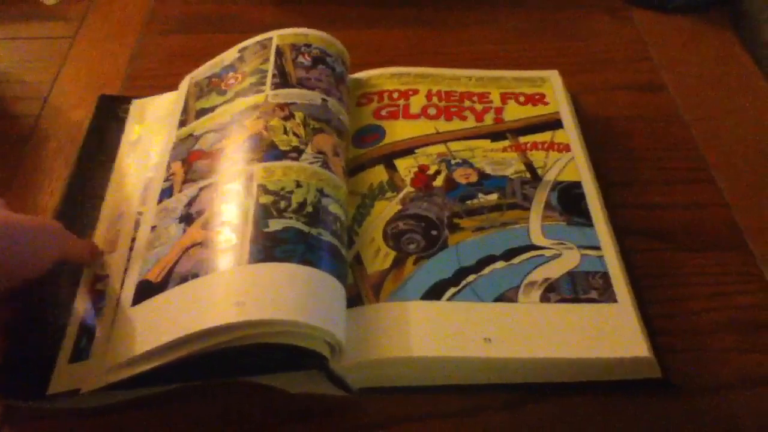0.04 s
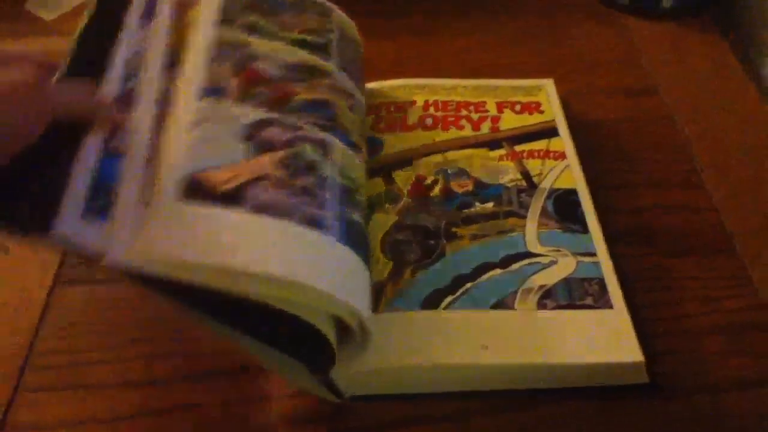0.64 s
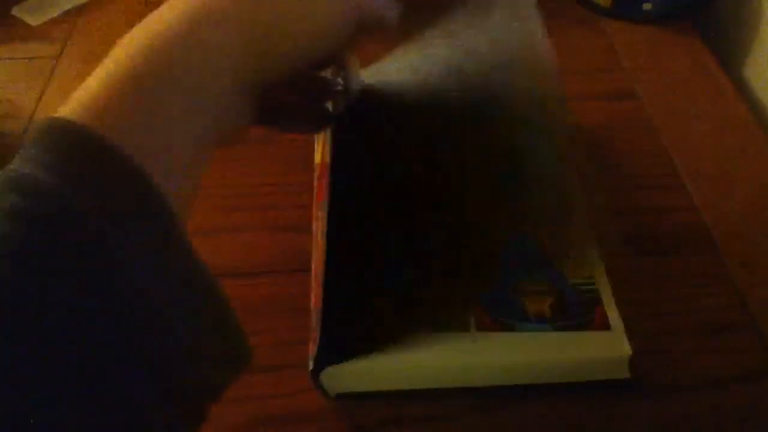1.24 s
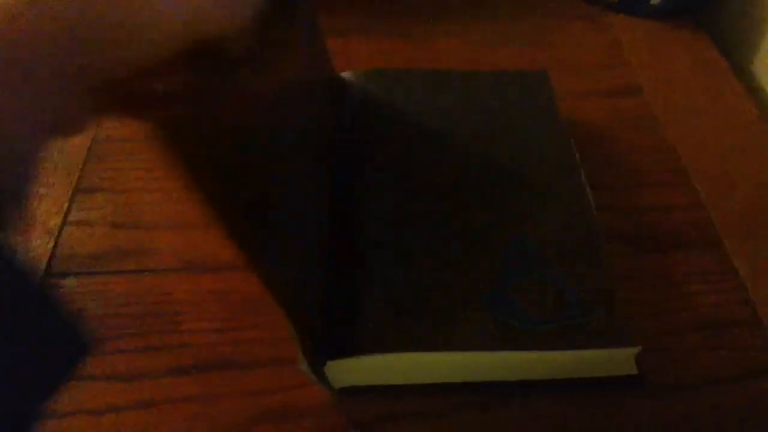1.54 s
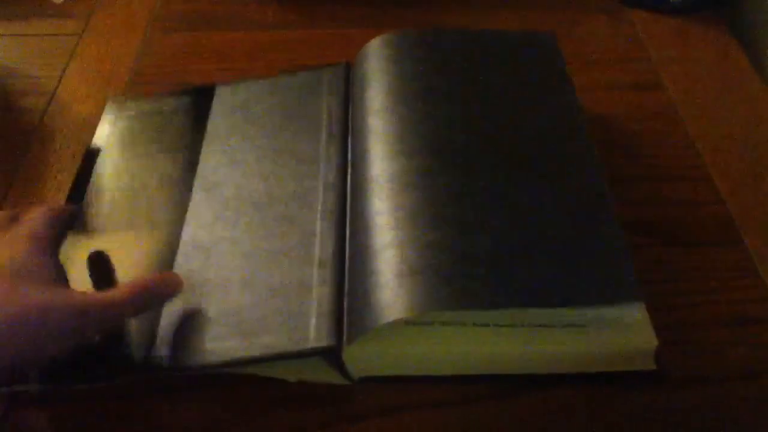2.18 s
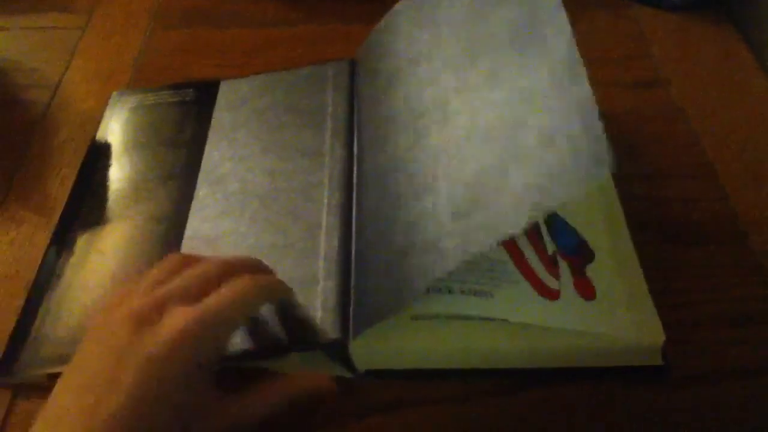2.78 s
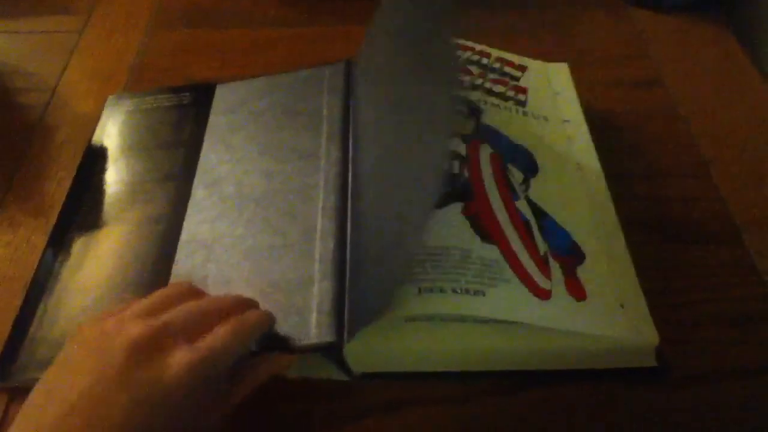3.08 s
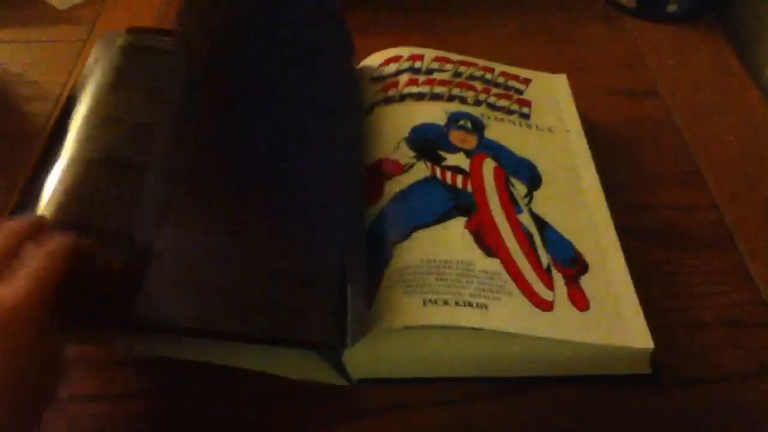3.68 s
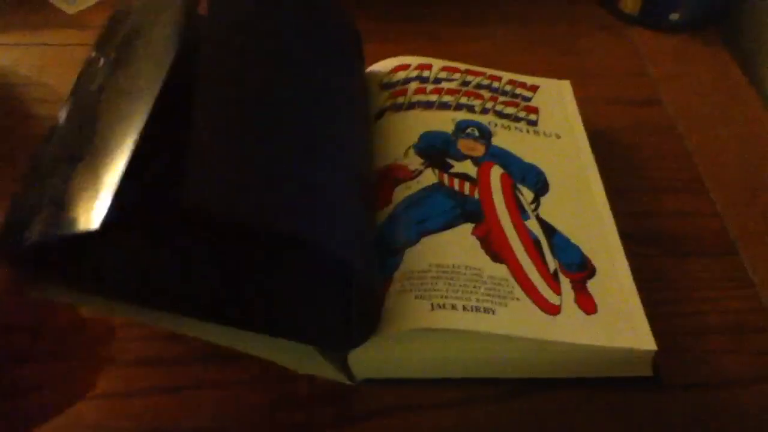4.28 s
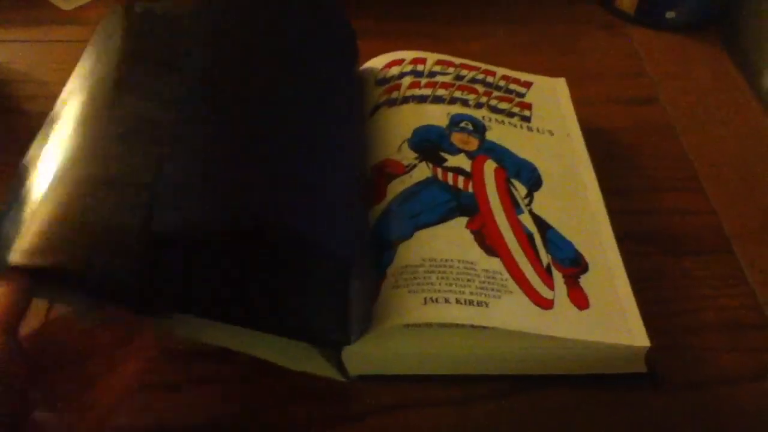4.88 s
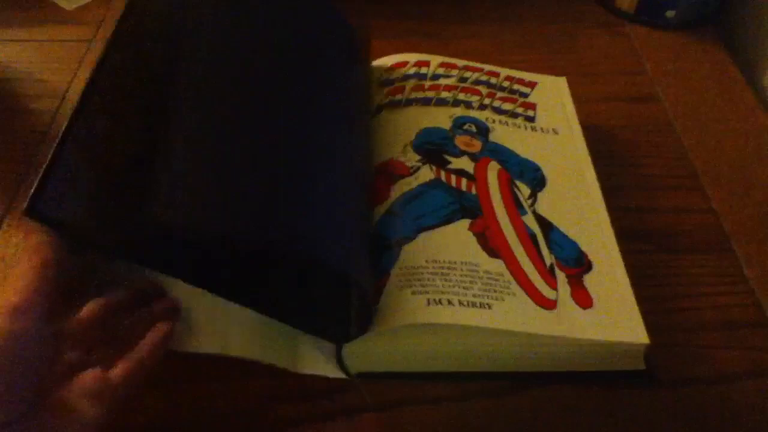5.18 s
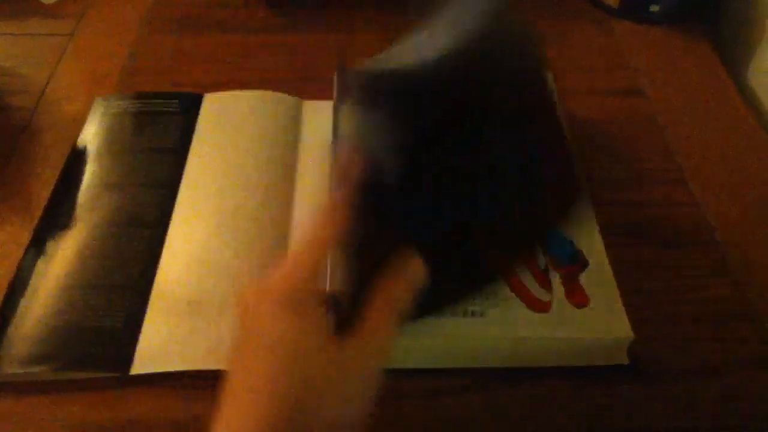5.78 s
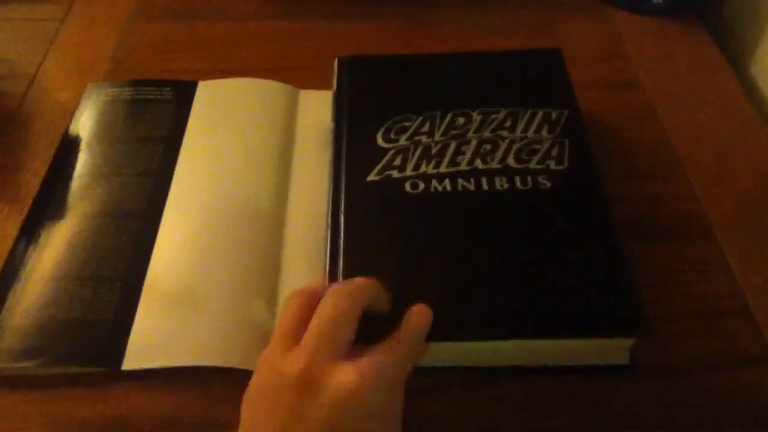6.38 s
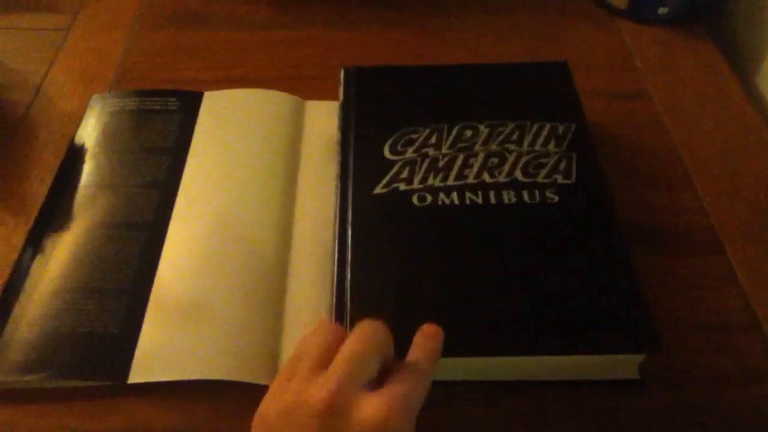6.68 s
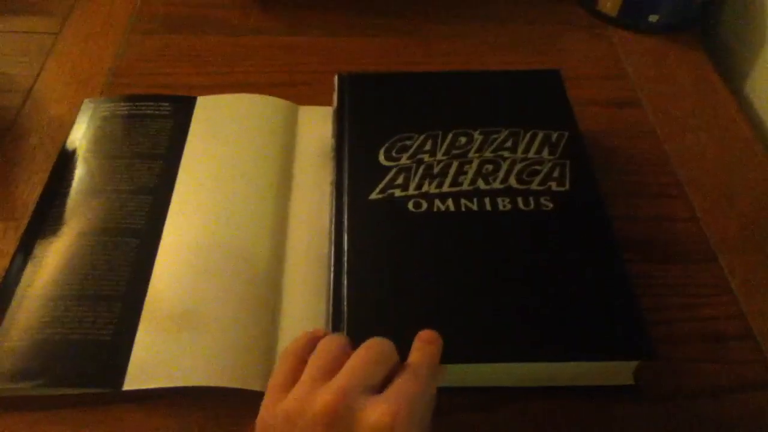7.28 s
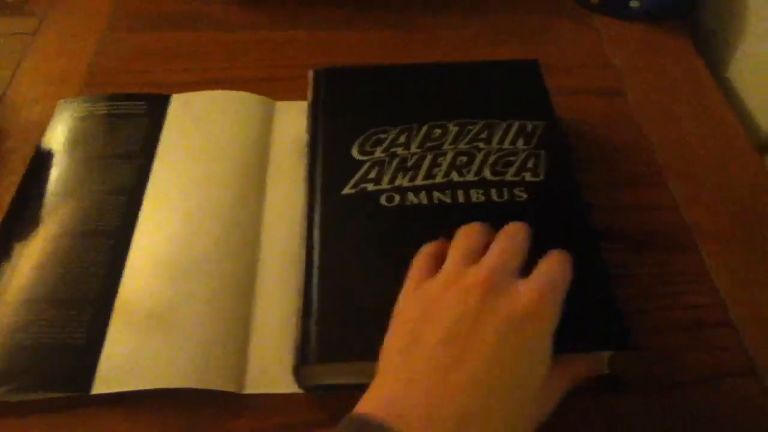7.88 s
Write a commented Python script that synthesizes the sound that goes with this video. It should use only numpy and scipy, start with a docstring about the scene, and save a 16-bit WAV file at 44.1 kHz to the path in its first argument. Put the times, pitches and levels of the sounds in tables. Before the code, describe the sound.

A thick hardback with glossy pages is handled on a wooden table in a small, quiet room, over faint rumble and microphone hiss. Soft rubbing and tiny crinkles fill the first second. At 1.1 seconds a block of pages slaps over loudly with a low thump, followed by smaller slaps until 1.5. The cover slides with a soft hiss around 2 seconds, and paper flicks at 2.3. Faint brushing continues, with a light knock at 3.5, a sharper flick at 4 and a low shuffle until 4.7. Just after 5 seconds the dust jacket drags and snaps free in a quick cluster, ending in a loud, sharp cover knock and thump at 5.3. Softer flicks and a bump follow until 5.7 as the book settles shut. Faint finger rubs come around 6 seconds and again near 8.

```python
"""Handling a glossy hardback

A thick book lies on a wooden table in a small, quiet room. A block of pages slaps over, the cover is
opened, the dust jacket slides, flicks and snaps free, and the book is shut. Paper cracks in bursts of
tiny contacts, the stiff cover knocks, the heavy block thumps, and sheets hiss as they rub."""
import sys
import numpy as np
from scipy import signal
from scipy.fft import rfft, irfft, next_fast_len
from scipy.io import wavfile

SR = 44100
rng = np.random.default_rng(int(sys.argv[2]) if len(sys.argv) > 2 else 0)


def master_out(mix):
    """Clip the mix to full scale and print it as 16-bit PCM to the path in sys.argv[1]."""
    frames = np.transpose(np.atleast_2d(mix))
    ceiling = np.clip(frames, -1, 1)
    pcm = np.round(ceiling * 32767).astype(np.int16)
    wavfile.write(sys.argv[1], SR, pcm)


N = 354561

# Room rumble and microphone hiss. Each row: frequency in Hz, relative level in dB.
ROOM_TONE_EQ = [(12, -56), (20, -16), (43, -10), (146, -5.5), (177, 0), (210, -7.5), (234, 1.5), (262, -7),
                (293, -7), (422, -11), (499, -13), (660, -16.5), (1480, -20), (14700, -27), (16000, -33.5)]
# The room's tail. Each row: frequency in Hz, level against the dry sound in dB, t60 in seconds.
REVERB_BANDS = [(118, -6, 0.19), (400, -3, 0.28), (1000, -6, 0.18), (2530, -7.5, 0.26), (6000, -13, 0.23),
                (14000, -13, 0.19)]

# Sheets and fingers rubbing.
# Each row: start in seconds, length in seconds, mid-stroke level in dB, tilt in dB per octave.
RUB_STROKES = [(0, .16, -58.5, -3), (.23, 0.18, -60, -5.5), (0.403, .14, -55, -1), (0.556, .12, -64, -1),
               (0.757, 0.21, -62, -1), (2.331, 0.26, -60.5, 0), (2.76, 0.082, -60.5, -2),
               (3.001, 0.42, -68.5, -6), (3.36, .22, -55.5, 0), (3.58, 0.34, -56, .5),
               (5.224, 0.092, -42, -8.5), (5.33, 0.26, -54.5, -2.5), (5.751, 0.41, -59.5, 0),
               (6.198, 0.26, -68.5, -3), (7.679, 0.43, -62, 2)]
# The opened cover sliding over the table. Each row: start in seconds, length in seconds, level in dB.
SLIDE_SURGES = [(1.757, 0.14, -52), (1.883, 0.15, -51), (2.006, 0.11, -49.5), (2.09, .11, -58.5)]
# The tone of a rub, the slide, the jacket pull and one contact of paper on paper.
# Each row: frequency in Hz, relative level in dB.
RUB_EQ = [(100, -25), (500, -1.5), (950, 9.5), (1600, -1.5), (3500, 3), (5000, 0.5), (8000, 0),
          (12000, -2.5), (16000, -48)]
SLIDE_EQ = [(100, -23), (500, -6), (1000, 5), (1600, -2), (3000, 3), (5500, -0.5), (8000, -0.5),
            (12000, -6), (16000, -28)]
PULL_EQ = [(100, -9), (600, 5), (900, 7.5), (1400, 7.5), (2150, 10), (3500, 2.5), (7500, -7.5),
           (11000, -14.5), (16000, -31)]
PAPER_EQ = [(60, -8), (300, -8), (700, -0.5), (1100, 4), (1600, 4.5), (2500, 5), (3400, 2), (4500, 4),
            (5600, 0.5), (7500, 2.5), (11000, -4), (16000, -17.5)]

# Modes of the book lying on the table, and of its cover board.
# Each row: frequency in Hz, relative level in dB, t60 in seconds.
BLOCK_MODES = [(122.6, 2.5, 0.12), (184, -7, 0.044), (231, 12, 0.043), (366, -1.5, 0.057), (417, -18, .035)]
BOARD_MODES = [(376, 3, 0.013), (790, -31, .025), (1006, 11, 0.015), (1194, 4.5, 0.018), (1480, -3, 0.024),
               (1640, 0.5, 0.019), (2098, -2, 0.03), (7200, 9, 0.0023)]
# The book's weight meeting the table. Each row: start in seconds, level in dB over 10 ms.
THUMP_CUES = [(.114, -48.5), (1.1201, -26), (1.226, -44), (1.4171, -36.5), (2.454, -48.5), (5.262, -41),
              (5.318, -33.5), (5.473, -47), (5.708, -43), (5.726, -51)]
# Cover and jacket edges knocking. Each row: start in seconds, level in dB over 10 ms,
# contact time in ms, pitch ratio of the modes, chatter decay in ms.
KNOCK_CUES = [(.082, -54, .4, 0.42, 1.5), (.190, -53.5, 0.25, 0.98, 1.5), (.421, -54.5, .25, 0.55, 1.5),
              (0.478, -52, .18, 1.2, 1.5), (.566, -55, 0.18, 1.2, 1.5), (.620, -55.5, .25, 0.96, 3.5),
              (1.1028, -32.5, 0.59, 0.84, 10), (1.1145, -25.5, 0.082, 1.06, 1.9),
              (1.2202, -36.5, 0.077, 1.13, 4.5), (1.416, -41.5, 0.14, 1.03, 2.4),
              (2.2654, -42.5, 0.75, 0.97, 1.5), (2.4535, -47, 0.94, .56, 1.3), (3.469, -42, 0.26, 1.2, 7),
              (3.501, -53, 0.37, 1.16, 1.5), (3.678, -51.5, 0.75, .99, 3), (4.0309, -45, 0.11, 0.97, 2),
              (4.716, -45, 0.16, 0.95, 9), (5.26, -31.5, 0.15, 1.16, 19), (5.3174, -18.5, 0.045, 1.04, 2.2),
              (5.3194, -30.5, .07, 1.3, 5.9), (5.521, -49, 1, 1.05, 1.8)]
# The jacket buckling as it is held and bent.
# Each row: time in seconds, level in dB over 10 ms, crease resonance in Hz.
CRINKLE_CUES = [(0.114, -52.5, 500), (0.3007, -50.5, 1900), (.341, -49.5, 3730), (0.4775, -50, 3020),
                (.588, -51, 1100), (.775, -55.5, 3200), (1.867, -46.5, 4430), (2.3077, -49.5, 4000),
                (3.310, -57, 2200), (3.978, -59, 4000), (4.853, -56, 1000), (5.011, -52, 1700),
                (5.040, -56.5, 3000), (5.0837, -51, 1200), (5.5442, -50.5, 1000), (7.378, -59, 1500)]
# Sheets slapping down or snapping free. Each row: time of fullest contact in seconds, level in dB
# over 10 ms, contact spread in ms, tilt in dB per octave, resonance of the bent sheet in Hz.
SLAP_CUES = [(1.1122, -25, 0.5, -2, 5560), (1.1162, -16, 2.3, 4.5, 2410), (1.2241, -32.5, 0.26, 3, 7200),
             (1.4208, -39, 1.1, -2, 3420), (1.5345, -47.5, 0.97, 3.5, 4800), (2.2624, -35.5, .28, -4, 3350),
             (2.2666, -37.5, 1.6, -2, 890), (4.015, -46, 3.5, -3.5, 1400), (4.0288, -33, 2.4, -2.5, 2600),
             (4.183, -43, 14.7, -1, 2240), (4.716, -48.5, 9.4, -1, 1000), (5.1536, -37.5, 1.2, -2.5, 2100),
             (5.207, -38, .8, -4.5, 4000), (5.231, -37, 1, -0.5, 5460), (5.2624, -33, 2.4, -2.5, 2280),
             (5.3179, -30.5, 0.71, 2, 7200), (5.3273, -31.5, 0.37, -8, 1830),
             (5.3493, -38, .82, -2.5, 1110), (5.624, -40, 3.2, -1.5, 3720),
             (5.7108, -45.5, 0.75, -1.5, 10500)]


def undb(db):
    """Decibels to gain."""
    return 10 ** (np.asarray(db) / 20)


def unit(x):
    """Scale to rms 1."""
    return x / np.sqrt(np.mean(x ** 2))


def hit_level(x, db):
    """Scale a hit so that its energy, spread over 10 ms, has this level."""
    return x * undb(db) * np.sqrt(.01 * SR / np.sum(x ** 2))


def add(track, start_s, x):
    """Mix a sound into a track at its cue."""
    i = max(int(start_s * SR), 0)
    track[i:i + len(x)] += x[:max(len(track) - i, 0)]


def octaves(hz):
    """Octaves above 2 kHz, the pivot of every tilt."""
    return np.log2(hz / 2000)


def curve_at(hz, points):
    """Read (Hz, value) points on a log-frequency axis."""
    point_hz, value = np.transpose(points)
    return np.interp(np.log(hz + 1), np.log(point_hz), value)


def equalise(x, curve, tilt_db=0):
    """Minimum-phase EQ, tilted by tilt_db per octave above 700 Hz."""
    size = next_fast_len(len(x) + 2048) // 2 * 2
    hz = np.fft.rfftfreq(size, 1 / SR)
    db = curve_at(hz, curve) + tilt_db * octaves(np.maximum(hz, 700))
    cepstrum = irfft(np.log(undb(db)))
    cepstrum[1:size // 2] *= 2  # folded forward, so nothing rings ahead of an attack
    cepstrum[size // 2 + 1:] = 0
    return irfft(rfft(x, size) * np.exp(rfft(cepstrum)))[:len(x)]


def bands(x, count=17):
    """Split into overlapping bands that add up to the whole: (centre Hz, band) pairs."""
    centres = np.geomspace(62, 16000, count)
    spectrum, hz = rfft(x), np.fft.rfftfreq(len(x), 1 / SR)
    return [(c, irfft(spectrum * curve_at(hz, np.c_[centres, centres == c]), len(x))) for c in centres]


def wobble(n, rate):
    """Random modulation of spread near 1, with `rate` new values a second."""
    steps = np.arange(n) * rate / SR
    return np.interp(steps, np.arange(4096), rng.standard_normal(4096))


def ring(modes, ratio=1, size=12000):
    """Decaying modes of a struck body."""
    t = np.arange(size) / SR
    return sum(undb(db - 60 * t / t60) * np.sin(2 * np.pi * hz * ratio * t) for hz, db, t60 in modes)


def grains(n, scatter_db):
    """Dense tiny contacts; more scatter makes a grittier texture."""
    noise, strength = rng.standard_normal((2, 65536))[:, :n]
    return unit(noise * undb(scatter_db * strength))


def stroke(length_s, attack_s=0.019, release_s=0.037):
    """Envelope of one push of the hand: it gathers speed, holds and eases off."""
    t = np.arange(int(length_s * SR)) / SR
    return np.minimum(t / attack_s, 1) * np.minimum((length_s - t) / release_s, 1)


def room_tone(level_db=-56, waver_db=0.46):
    """The bed: a faintly wavering house rumble under even microphone hiss."""
    bed = unit(equalise(rng.standard_normal(N), ROOM_TONE_EQ))
    rumble = signal.sosfilt(signal.butter(2, 450, fs=SR, output="sos"), bed)
    waver = undb(waver_db * wobble(N, rate=12)) - 1
    return (bed + rumble * waver) * undb(level_db)


def reverb(x, build_s=0.0012, size=22050):
    """Dense reflections build within milliseconds and leave a short tail, faintest in the treble."""
    t, table, tail = np.arange(size) / SR, np.array(REVERB_BANDS), 0
    for hz, band in bands(rng.standard_normal(size)):
        wet_db, t60 = curve_at(hz, table[:, [0, 1]]), curve_at(hz, table[:, [0, 2]])
        fade = (1 - np.exp(-t / build_s)) * undb(-60 * t / t60)
        tail += band * fade / np.sqrt(np.sum(fade ** 2)) * undb(wet_db)
    return x + signal.fftconvolve(x, tail)[:N]


def spine_shuffle(start_s=4.13, length_s=0.58, level_db=-57.5):
    """The hand shifts the book: small slips of the spine keep the block's low modes murmuring."""
    out = np.zeros(N)
    swell = np.sin(np.linspace(0, np.pi, int(length_s * SR)))
    slips = grains(len(swell), scatter_db=0.5)
    murmur = signal.fftconvolve(slips, ring(BLOCK_MODES))[:len(swell)]
    add(out, start_s, unit(murmur) * swell * undb(level_db))
    return out


def friction(envelope, tilt_db, curve, scatter_db, catch_db):
    """Paper fibres catch and slip; the tilt sets the brightness without changing the level."""
    slips = equalise(grains(len(envelope), scatter_db), curve)
    hiss, power = 0, 0
    for hz, band in bands(slips):
        gain = undb(tilt_db * octaves(max(hz, 700)))
        hiss += gain * band
        power += gain ** 2 * np.mean(band ** 2)
    catch = undb(catch_db * wobble(len(envelope), rate=120))
    return unit(hiss / np.sqrt(power)) * envelope * catch


def page_rubs(swell_db=5):
    """Sheets and fingers brush over each other in short strokes."""
    out = np.zeros(N)
    for start_s, length_s, db, tilt_db in RUB_STROKES:
        push = stroke(length_s)
        arc = np.sin(np.linspace(0, np.pi, len(push)))  # the hand is fastest in mid-stroke
        envelope = undb(db + swell_db * (arc - 1)) * push
        add(out, start_s, friction(envelope, tilt_db, RUB_EQ, scatter_db=3.0, catch_db=2.3))
    return out


def cover_slide(start_hz=6300, sink_octaves_per_s=3.8, width_octaves=0.55, peak_db=11, catch_db=1.0):
    """The glossy jacket hisses over the wood; its resonance sinks as more of it lies flat."""
    out = np.zeros(N)
    for start_s, length_s, db in SLIDE_SURGES:
        surge = stroke(length_s)
        elapsed = start_s - SLIDE_SURGES[0][0] + np.arange(len(surge)) / SR
        centre_hz = start_hz * 2 ** (-sink_octaves_per_s * elapsed)
        slips = equalise(grains(len(surge), scatter_db=3.0), SLIDE_EQ)
        hiss = 0
        for hz, band in bands(slips, count=33):
            bell = np.exp(-.5 * (np.log2(hz / centre_hz) / width_octaves) ** 2)
            hiss += band * undb(peak_db * bell)
        add(out, start_s, unit(hiss) * surge * undb(db + catch_db * wobble(len(surge), rate=90)))
    return out


def jacket_pull(start_s=5.07, length_s=0.195, whip_s=5.187, whip_width_s=0.026, gain_db=-34):
    """The jacket drags, then whips off the board; the faster it moves, the louder and brighter it is."""
    out, grip = np.zeros(N), stroke(length_s)
    t = start_s + np.arange(len(grip)) / SR
    whip = np.exp(-.5 * ((t - whip_s) / whip_width_s) ** 2)
    speed = undb(-15.5) + whip  # a slow drag under the whip
    tilt_db = 7 + 0.5 * 20 * np.log10(speed)  # half a dB per octave for each dB of speed
    envelope = undb(gain_db) * grip * speed
    add(out, start_s, friction(envelope, tilt_db, PULL_EQ, scatter_db=2.5, catch_db=2.0))
    return out


def block_thumps(detune=0.034, low_cut_hz=110):
    """The heavy block of pages shakes the table, its pitch varying a little as its weight shifts."""
    out = np.zeros(N)
    low_cut = signal.butter(2, low_cut_hz, "high", fs=SR, output="sos")
    for start_s, db in THUMP_CUES:
        body = ring(BLOCK_MODES, 1 + detune * rng.standard_normal())
        add(out, start_s, hit_level(signal.sosfilt(low_cut, body), db))
    return out


def cover_knocks(leak_hz=260, detune=0.1, rebounds=8, rebound_ms=3.8, rebound_scatter=0.211):
    """The stiff, damped board rings briefly and a loose edge chatters; longer contacts sound duller."""
    out, t_ms = np.zeros(N), np.arange(256) * 1000 / SR
    # air slips round the edge of the board, so it radiates little bass
    leak = signal.butter(2, leak_hz, "high", fs=SR, output="sos")
    for start_s, db, contact_ms, ratio, chatter_ms in KNOCK_CUES:
        push = t_ms * np.exp(-4 * t_ms / contact_ms)
        board, late_ms = ring(BOARD_MODES, ratio, size=6000), 0
        for gap, pitch in rng.standard_normal((rebounds, 2)):
            late_ms += rebound_ms * np.exp(rebound_scatter * gap)
            touch = ring(BOARD_MODES, ratio * np.exp(detune * pitch), size=2000)
            add(board, late_ms / 1000, touch * np.exp(-late_ms / chatter_ms))
        knock = signal.sosfilt(leak, np.convolve(board, push))
        add(out, start_s, hit_level(knock, db))
    return out


def jacket_crinkles(spread_ms=2.4):
    """Cues for faint paper cracks: creases give way equally fast, tighter ones higher and brighter."""
    return [(time_s, db, spread_ms, -2.4 + 1.1 * octaves(hz), hz) for time_s, db, hz in CRINKLE_CUES]


def landing(t_ms, spread_ms):
    """Contacts crowd around one instant; they come from all over the sheet, so no pitch stands out."""
    crowd = np.exp(-.5 * (t_ms / spread_ms) ** 2)
    contacts = grains(len(t_ms), scatter_db=5.0) * crowd
    for _ in range(3):
        flat_spectrum = np.exp(1j * np.angle(rfft(contacts)))
        contacts = irfft(flat_spectrum) * np.sqrt(crowd)  # keep the burst tight
    return unit(contacts)


def paper_cracks(cues, size=8192, settle_db=-12, settle_s=0.01, flex_db=2, flex_q=3.4):
    """A sheet lands patch by patch, then crinkles as it settles; its bend favours one pitch."""
    out = np.zeros(N)
    t = (np.arange(size) - size // 4) / SR  # zero at the fullest contact
    for time_s, db, spread_ms, tilt_db, flex_hz in cues:
        settling = grains(size, scatter_db=7.5) * (t > 0) * np.exp(-abs(t) / settle_s)
        contacts = landing(1000 * t, spread_ms)
        flex = signal.lfilter(*signal.iirpeak(flex_hz, flex_q, fs=SR), contacts)
        sheet = unit(contacts + undb(flex_db) * flex) + undb(settle_db) * unit(settling)
        add(out, time_s + t[0], hit_level(equalise(sheet, PAPER_EQ, tilt_db), db))
    return out


def scene():
    """Mono mix: hits and friction share one small room, over the bed of room tone."""
    hits = paper_cracks(SLAP_CUES + jacket_crinkles()) + cover_knocks() + block_thumps()
    rubbing = spine_shuffle() + page_rubs() + jacket_pull() + cover_slide()
    return (reverb(hits + rubbing) + room_tone())[None]


def record(dry):
    """The small microphone loses the deep bass and the very top."""
    bass_cut = signal.butter(2, 45, "high", fs=SR, output="sos")
    top_cut = signal.ellip(10, .2, 70, 16000, fs=SR, output="sos")
    return signal.sosfilt(top_cut, signal.sosfilt(bass_cut, dry))


dry = scene()
out = record(dry)
master_out(out)
```